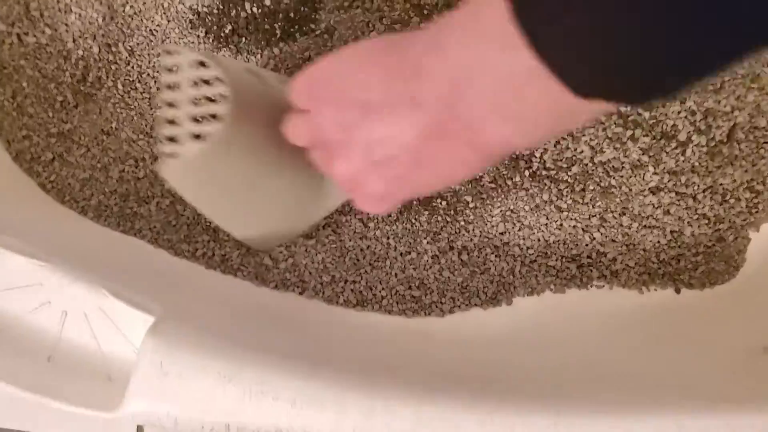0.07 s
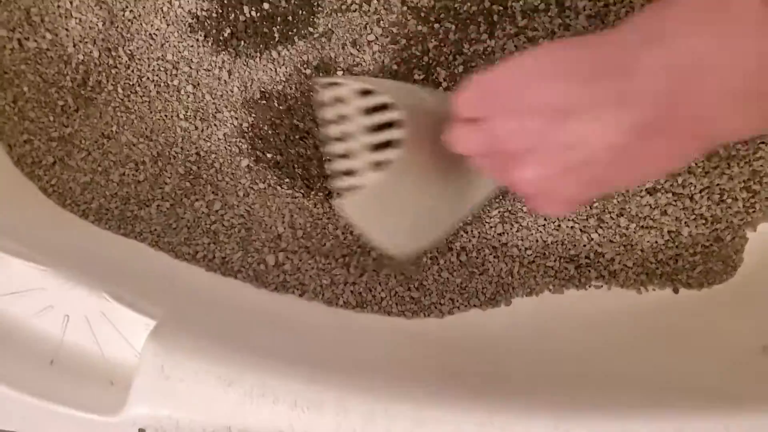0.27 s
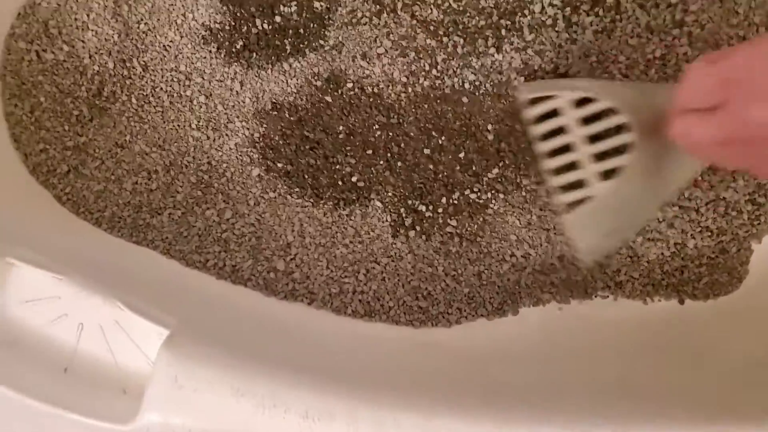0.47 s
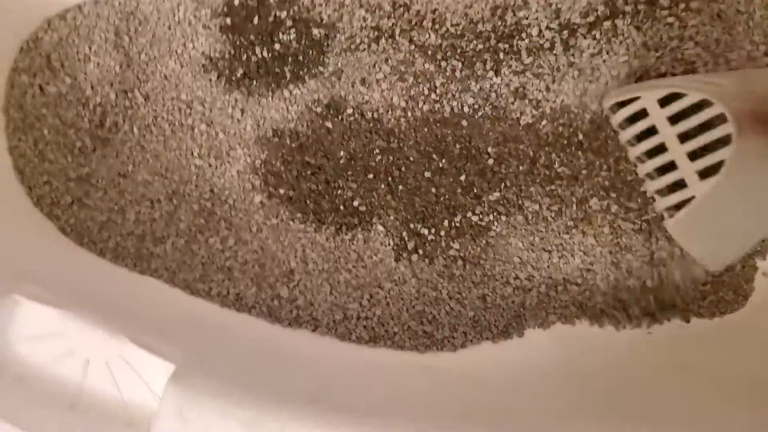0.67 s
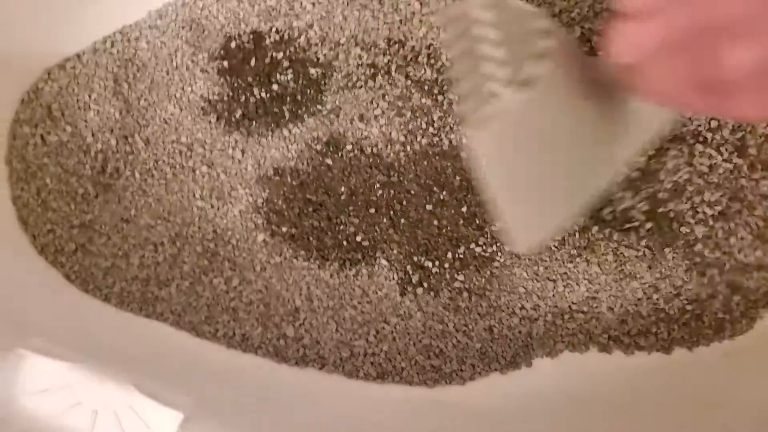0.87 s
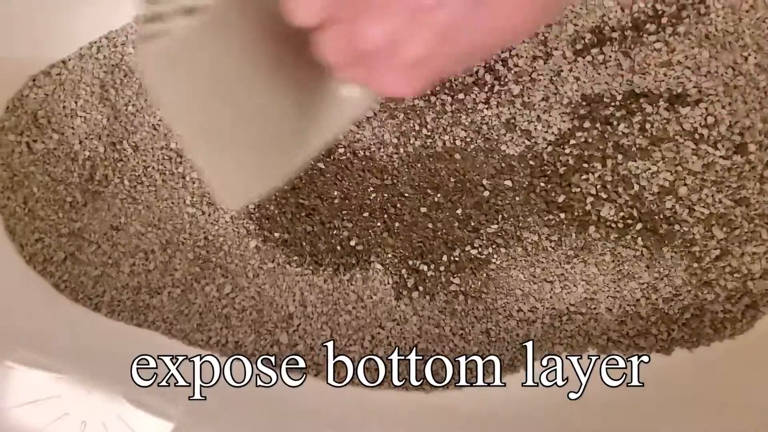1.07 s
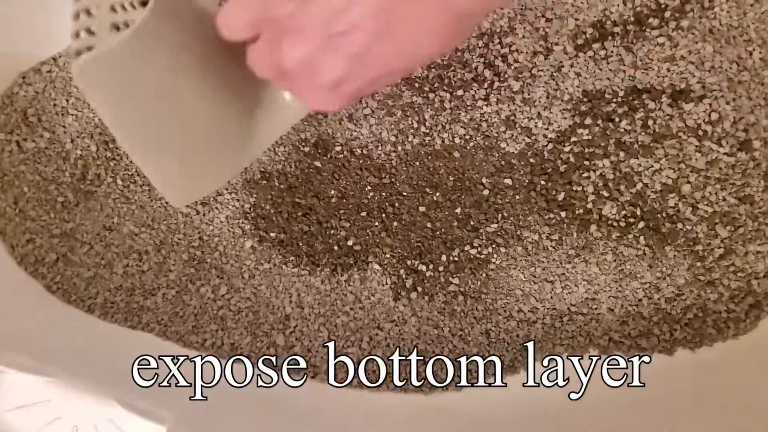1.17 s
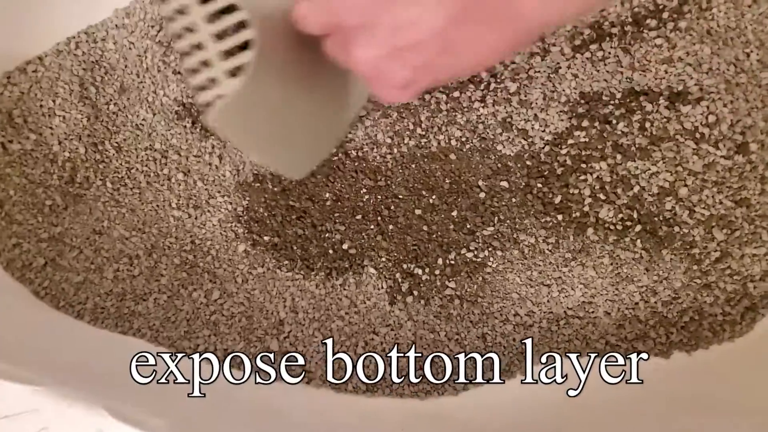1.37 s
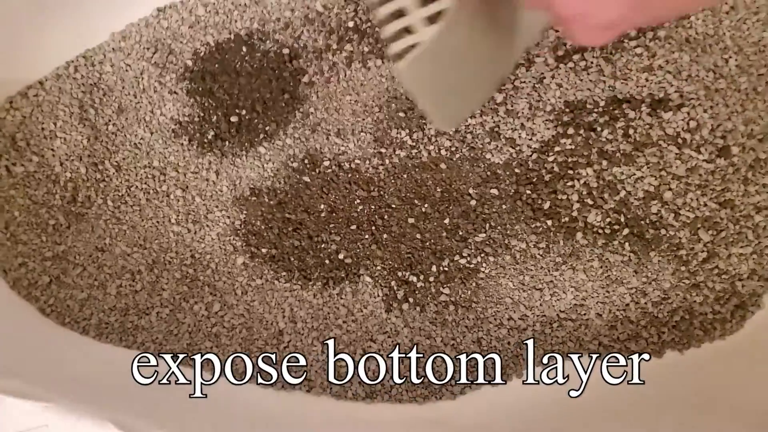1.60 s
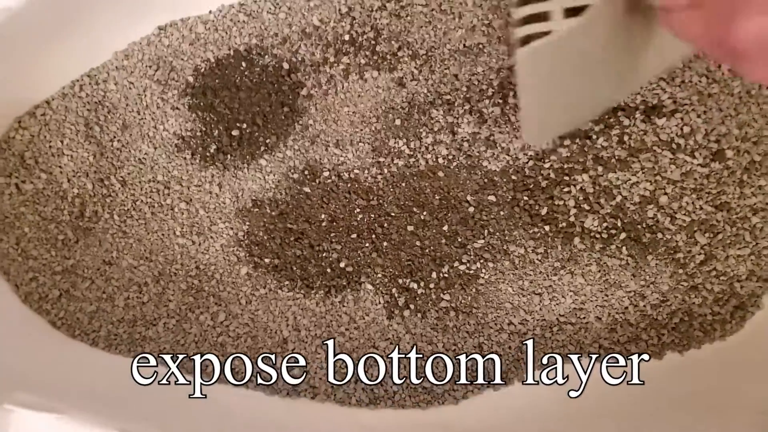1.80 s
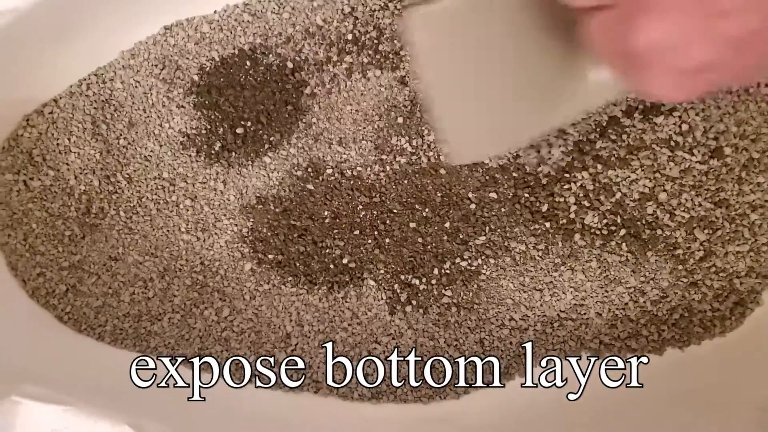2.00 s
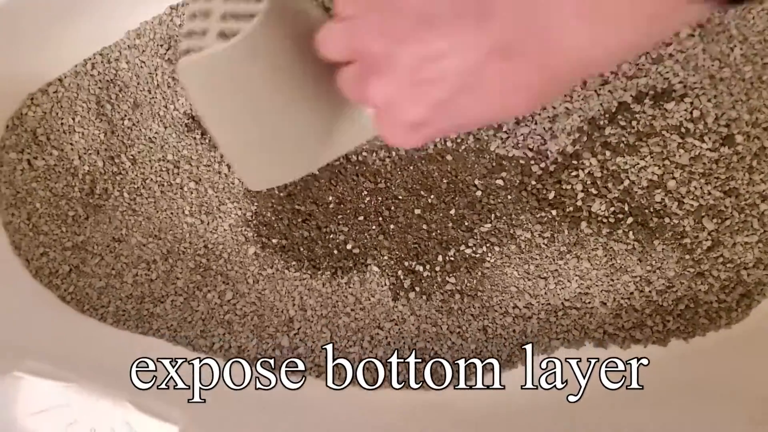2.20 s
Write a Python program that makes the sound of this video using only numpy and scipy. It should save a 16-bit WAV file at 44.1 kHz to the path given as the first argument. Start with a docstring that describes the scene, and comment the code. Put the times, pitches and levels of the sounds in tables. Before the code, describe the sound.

Gritty scrapes of a plastic scoop pushed through cat litter in a plastic tray, close by.

```python
"""A plastic scoop rakes three times through granular litter in a plastic tray, close by in a small room.
Grains grind, fizz and snap; their slips make the tray drone and the scoop ring. The hard first sweep
scrapes and knocks the tray, pushed-up litter spills back and stray grains tick on the plastic.
From 0.8 s a softer push judders along and ends in a second, smaller spill.
At 1.7 s a last drag digs in, judders twice and fades."""
import sys
import numpy as np
from scipy import signal
from scipy.fft import rfft, irfft
from scipy.io import wavfile

SR = 44100
rng = np.random.default_rng(int(sys.argv[2]) if len(sys.argv) > 2 else 0)


def pcm_store(signal):
    """Save signal as 16-bit PCM."""
    levels = np.round(np.clip(np.atleast_2d(signal), -1, 1) * 32767)
    wavfile.write(sys.argv[1], SR, levels.astype(np.int16).T)


N = 99225
T = np.arange(N) / SR


def amp(db):
    """Decibels to gain."""
    return np.exp(np.asarray(db) * (np.log(10) / 20))


def unit(x):
    """Scales to rms 1."""
    return x / np.sqrt(np.mean(x ** 2) + 1e-20)


def curve_at(points, hz):
    """Reads a curve on a log-frequency axis."""
    f, value = np.transpose(points)
    return np.interp(np.log(hz + 1), np.log(f), value)


def pan(db):
    """Left and right gains; positive dB leans left."""
    return amp(np.array([[.5], [-.5]]) * db)


def convolve(x, response):
    """Plays both channels through a response."""
    return signal.fftconvolve(x, np.atleast_2d(response), axes=1)[:, :N]


def eq(x, points, size=4096):
    """Minimum-phase filter with the given curve."""
    log_gain = np.log(amp(curve_at(points, abs(np.fft.fftfreq(size, 1 / SR)))))
    response = np.fft.ifft(np.exp(np.conj(signal.hilbert(log_gain)))).real
    return convolve(x, response[:size // 2])


def ring(modes):
    """Dying sines of a struck object, alternating in polarity."""
    t = T[:SR // 8]
    return sum((-1) ** k * amp(db - 60 * t / t60) * np.sin(2 * np.pi * hz * t)
               for k, (hz, db, t60) in enumerate(modes))


SLIPS_PER_S, GRINDS_PER_S, FALLS_PER_S, FIZZ_PER_S = 1500, 5000, 6600, 8000
def grains(rate, spread_db):
    """Random collisions at each ear: many small, a few large."""
    chance, strength = rng.random((2, 2, N))
    hit = chance < rate / SR
    signed = 2 * strength[hit] - 1
    level_db = -spread_db * np.log(np.maximum(abs(signed), .007))
    out = np.zeros((2, N))
    out[hit] = np.sign(signed) * amp(level_db)
    return out


def impulses(cues):
    """One panned impulse per cue."""
    out = np.zeros((2, N))
    for s, db, pan_db in cues:
        out[:, round(s * SR)] += amp(db) * pan(pan_db)[:, 0]
    return out


def swells(cues):
    """One bell-shaped fade up and down per cue."""
    return sum(amp(db) * np.exp(-.5 * ((T - s) / width) ** 2) for s, width, db in cues)


# background EQ: f/Hz, level/dB
ROOM_TONE_EQ = [(20, -6.5), (60, -1.5), (130, -14), (500, -20.5), (2000, -30), (16000, -31.5)]
def room_tone(level_db=-82):
    """Faint, bass-heavy noise under the whole scene."""
    return amp(level_db) * unit(eq(rng.standard_normal((2, N)), ROOM_TONE_EQ))


# envelopes of the three strokes: t/s, pressure/dB, grind/dB, fizz/dB
SWEEP = [(0, -56, -61, -63.5), (.12, -48, -54, -47.5), (.2, -45, -43, -54), (.28, -32, -33, -43.5),
         (.338, -30.5, -29.5, -38), (.35, -28.5, -25.5, -38.5), (.368, -31.5, -25.5, -41),
         (.38, -35, -29, -38.5), (.415, -32, -31.5, -43), (.44, -48, -35.5, -41), (.5, -51.5, -46, -51),
         (.625, -60, -48, -57.5), (.68, -69, -62.5, -68.5), (.73, -70, -71, -78)]
PUSH = [(0.799, -84, -61, -78.5), (0.826, -61.5, -57.5, -53.5), (0.911, -54, -58, -60.5),
        (.917, -45, -45, -51), (0.972, -45, -43.5, -53.5), (1.052, -44, -67, -56.5),
        (1.13, -47.5, -53.5, -57), (1.2, -43.5, -51.5, -52.5), (1.3, -52.5, -50.5, -50.5),
        (1.335, -65, -59, -57), (1.36, -82, -65, -55), (1.41, -79.5, -74, -74)]
DRAG = [(1.716, -69, -69.5, -65), (1.734, -54, -54.5, -55), (1.762, -43.5, -51.5, -54),
        (1.799, -39.5, -53, -62), (1.829, -50, -63, -70), (1.879, -44.5, -46.5, -52.5),
        (1.95, -43, -52, -54.5), (2.027, -36.5, -48, -53.5), (2.059, -46.5, -47.5, -52.5),
        (2.15, -54.5, -62.5, -61), (2.21, -60, -61, -62), (2.25, -63.5, -54, -58)]
def strokes():
    """The hand's gesture as pressure, grind and fizz in dB; silent while the scoop is lifted."""
    gestures = [np.transpose(rows) for rows in (SWEEP, PUSH, DRAG)]
    return [np.max([np.interp(T, g[0], g[lane], left=-120, right=-120) for g in gestures], axis=0)
            for lane in (1, 2, 3)]


# low modes of the tray floor: f/Hz, level/dB, t60/s
TRAY_MODES = [(268, -6, 0.027), (322.3, -1.5, 0.3), (352, -4, 0.032), (409.2, -12.5, 0.12),
              (506, -7.5, 0.056), (600, -4, 0.078)]
# EQ of the tray's dull body: f/Hz, level/dB
THUD_EQ = [(20, -33.5), (60, -22), (130, -12), (200, -8.5), (280, 2), (450, -2), (900, -30), (3000, -64)]
def tray_drone(press_db, hard_from_db=-38.5):
    """Slips of packed litter shake the tray floor; under hard pressure the thud grows faster."""
    drone = unit(convolve(grains(SLIPS_PER_S, spread_db=1.5), ring(TRAY_MODES)))
    thud = unit(eq(grains(SLIPS_PER_S, spread_db=1.5), THUD_EQ))
    boom_db = np.maximum(press_db - hard_from_db, 0)
    return amp(press_db) * (amp(-3.5) * drone + amp(-7 + boom_db) * thud)


# EQ of the tray's low end: f/Hz, level/dB
RUMBLE_EQ = [(15, -21.5), (45, -3), (75, -2), (120, -4), (250, -9.5), (1000, -50.5)]
# the blade digs in: t/s, width/s, level/dB
DIGS = [(.97, 0.021, -60), (1.805, 0.036, -54.5)]
def tray_rumble(press_db):
    """The whole tray rumbles as it is pushed, swelling where the blade digs in."""
    rumble = unit(eq(grains(SLIPS_PER_S, spread_db=2.2), RUMBLE_EQ))
    return rumble * (amp(-37.5 + .54 * press_db) + swells(DIGS))


# modes of the scoop: f/Hz, level/dB, t60/s
SCOOP_MODES = [(483, -2.5, 0.039), (683, -1.5, .035), (776, -2, 0.069), (839, -1.5, 0.072),
               (913.6, -3, 0.057), (1018, -4, 0.056), (1128, -9.5, 0.033), (1340, -8.5, 0.019),
               (1615, -13.5, 0.056)]
def scoop_ring(press_db, grind_db):
    """Grains rub the hollow blade into ringing, which follows pressure and grind equally."""
    rub = unit(convolve(grains(GRINDS_PER_S, spread_db=2.0), ring(SCOOP_MODES)))
    return rub * amp(-.5 + (press_db + grind_db) / 2)


# EQ of the midrange crunch: f/Hz, level/dB
GRIND_EQ = [(100, -31), (400, -5.5), (800, -2), (1100, 0), (1600, 1.5), (2000, -2), (2700, -2), (4000, -7),
            (6000, -15.5), (9000, -22), (16000, -34)]
# its pan moves: t/s, pan/dB
GRIND_PAN = [(0, 2.9), (.37, 0.048), (.6, 2.1), (.95, 2.2), (1.5, -0.28), (2.25, 1.6)]
def grind(grind_db):
    """Coarse grains grind on each other."""
    crunch = unit(eq(grains(GRINDS_PER_S, spread_db=2.5), GRIND_EQ))
    return crunch * amp(grind_db) * pan(np.interp(T, *np.transpose(GRIND_PAN)))


# EQ of the bright crackle: f/Hz, level/dB
FIZZ_EQ = [(500, -40.5), (2500, -2.5), (4500, 6.5), (6500, 4.5), (8500, 0), (11000, 0), (13500, 2),
           (15500, 4)]
# its pan moves: t/s, pan/dB
FIZZ_PAN = [(0, 7.5), (.15, 12.5), (.26, 5.5), (.5, 4), (.94, 7), (1.05, 0.5), (2.25, 2.5)]
def fizz(fizz_db):
    """Fine grains crackle along the blade."""
    crackle = unit(eq(grains(FIZZ_PER_S, spread_db=2.6), FIZZ_EQ))
    return crackle * amp(1 + fizz_db) * pan(np.interp(T, *np.transpose(FIZZ_PAN)))


# snap cues: t/s, level/dB, pan/dB
SNAPS = [(.0945, -31, 8), (.111, -32, 8), (.1355, -29, 8), (.692, -46, 2), (.8125, -47, 3), (.823, -35, 6),
         (.9165, -35, 4), (1.35, -32, 6), (1.361, -37, 3), (1.418, -41, 0), (1.4295, -34, 0),
         (1.438, -28, 0), (1.4437, -22, 0), (1.759, -37, 0)]
# EQ of a snap: f/Hz, level/dB
SNAP_EQ = [(200, -20.5), (1200, -3), (4000, 1.5), (15000, 0)]
def snaps(tail_s=.001, tail_db=-15):
    """Single grains snap on the bed: a click with a tiny noise tail."""
    crack = amp(tail_db) * rng.standard_normal((2, SR // 50)) * np.exp(-T[:SR // 50] / tail_s)
    crack[:, 0] = 1
    return eq(convolve(impulses(SNAPS), crack), SNAP_EQ)


# scrape cues: t/s, width/s, level/dB
SCRAPES = [(.29, .05, -35), (.359, .011, -25), (.455, .015, -40.5), (.932, 0.014, -44.5),
           (1.444, 0.0032, -44)]
# high modes of the tray: f/Hz, level/dB, t60/s
SCRAPE_MODES = [(1040, 0.5, .06), (1135, 0, .045), (1350, 0, .05), (1627, -2, .06), (1690, -1, .05),
                (1878, -15, .06), (2499, -5, .05), (2957, -10.5, .05), (3081, -5.5, .06)]
def scrapes():
    """Grains pressed hard against the plastic bring out its higher modes."""
    rasp = unit(convolve(grains(GRINDS_PER_S, spread_db=1.8), ring(SCRAPE_MODES)))
    return rasp * swells(SCRAPES) * pan(db=-2)


# knock cues: t/s, level/dB, pan/dB
KNOCKS = [(.289, -20.5, 2), (.3425, -7.5, 1)]
# modes of the bumped tray: f/Hz, level/dB, t60/s
KNOCK_MODES = [(115.4, -15, 0.024), (258, -1.5, .035), (341, -5.5, .04)]
def knocks():
    """The blade bumps the tray floor in the hard sweep."""
    return convolve(impulses(KNOCKS), ring(KNOCK_MODES)) * pan(db=1)


# handfuls falling back: t/s, level/dB, rise/s, decay/s, tilt/(dB per octave), pan/dB
SPILLS = [(0.458, -27, .012, .016, 2, -1.5), (1.444, -38.5, 0.011, 0.022, 0.35, -1.5)]
# EQ of falling grains: f/Hz, level/dB
SPILL_EQ = [(100, -32.5), (500, -10.5), (750, -6), (1000, -1), (1800, -1), (2600, 1.5), (3200, -1.5),
            (5000, -6), (8000, -11.5), (12000, -15), (16000, -12)]
def spills():
    """Showers of grains land on the bed and settle."""
    out = np.zeros((2, N))
    for s, db, rise, decay, tilt_db, pan_db in SPILLS:
        tilted_eq = [(hz, level + tilt_db * np.log2(hz)) for hz, level in SPILL_EQ]
        shower = unit(eq(grains(FALLS_PER_S, spread_db=3.0), tilted_eq))
        envelope = np.exp(-np.maximum((s - T) / rise, (T - s) / decay))
        out += amp(db) * envelope * shower * pan(pan_db)
    return out


# tick cues: t/s, level/dB, pan/dB
TICKS = [(.7445, -49, 0), (.7738, -55, 0)]
# modes of the tapped plastic: f/Hz, level/dB, t60/s
TICK_MODES = [(400, -12, .015), (880, -9, .012), (1900, -4, .014), (3171, 0, .024), (5500, -20, .006)]
def ticks():
    """Stray grains bounce on the scoop."""
    return convolve(impulses(TICKS), ring(TICK_MODES))


# judder cues: t/s, width/s, level/dB
JUDDERS = [(.835, 0.016, -56.5), (1.28, 0.033, -44.5), (1.755, 0.018, -45), (2.02, 0.055, -51)]
# modes of the juddering blade: f/Hz, level/dB, t60/s
JUDDER_MODES = [(640, 3, 0.036), (721, -2, 0.032)]
def judders(press_db):
    """The blade judders now and then, only while it is in the litter."""
    chatter = unit(convolve(grains(SLIPS_PER_S, spread_db=1.2), ring(JUDDER_MODES)))
    touching = press_db > -100
    return chatter * swells(JUDDERS) * touching


# reverb decay: f/Hz, t60/s
REVERB_T60 = [(100, .3), (500, 0.33), (2000, 0.22), (6000, .26), (16000, 0.15)]
def reverb(x, size=256):
    """Dense reflections from the tray walls and the room, the treble dying first."""
    taps = rng.standard_normal((2, SR // 2)) * (T[:SR // 2] > .001)  # 1 ms pre-delay
    hz, t, bands = signal.stft(taps, SR, nperseg=size)
    decay = amp(-60 * t / curve_at(REVERB_T60, hz)[:, None])
    tail = signal.istft(bands * decay, SR, nperseg=size)[1]
    return convolve(x[::-1], tail / np.linalg.norm(tail[0]))  # each side feeds the opposite one


# stereo width: f/Hz, side gain/dB
WIDTH = [(60, -7.5), (200, -13.5), (380, -9.5), (700, -5), (1300, -1), (2400, -0.5), (8000, 0)]
def narrow(x):
    """Two close microphones hear nearly the same bass but different treble."""
    side_gain = amp(curve_at(WIDTH, np.fft.rfftfreq(N, 1 / SR)))
    mid = rfft(x[0] + x[1])
    side = rfft(x[0] - x[1]) * side_gain
    return irfft(np.array([mid + side, mid - side]), N) / np.sqrt(2)


def scene(reverb_db=-8):
    """The mix: textures, reverb and room tone are narrowed; the dry hits keep their pan."""
    press_db, grind_db, fizz_db = strokes()
    plastic = tray_drone(press_db) + tray_rumble(press_db)
    plastic += scoop_ring(press_db, grind_db) + judders(press_db)
    textures = plastic + grind(grind_db) + fizz(fizz_db) + scrapes() + spills()
    hits = snaps() + knocks() + ticks()
    ambience = room_tone() + amp(reverb_db) * reverb(textures + hits)
    return hits + narrow(textures + ambience)


def record(dry):
    """A steep 16 kHz low-pass on the master."""
    low_pass = signal.firwin(511, 16000, window=("kaiser", 9), fs=SR)
    return signal.oaconvolve(dry, low_pass[None], "same")


dry = scene()
out = record(dry)
pcm_store(out)
```